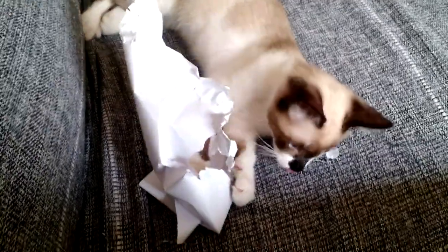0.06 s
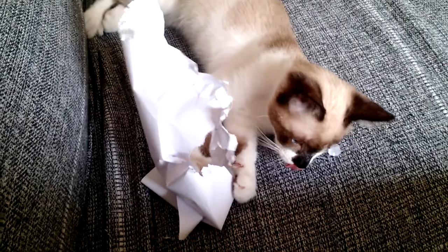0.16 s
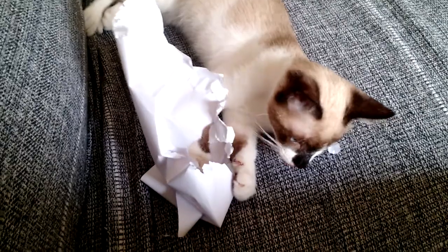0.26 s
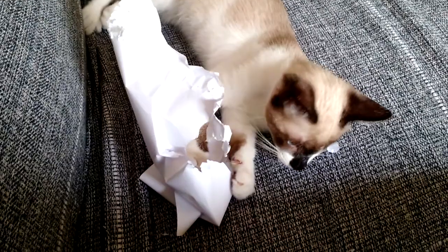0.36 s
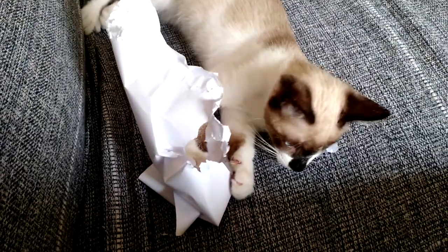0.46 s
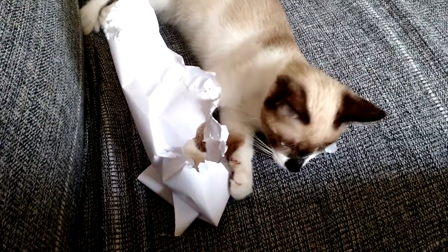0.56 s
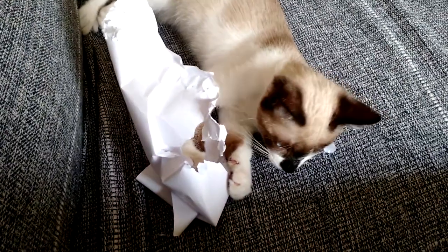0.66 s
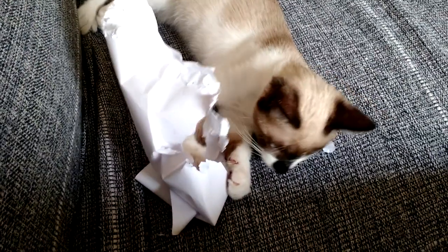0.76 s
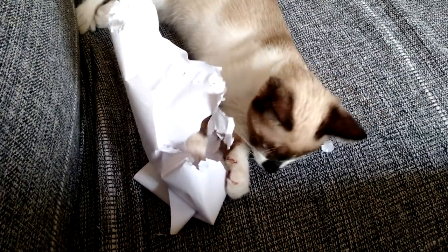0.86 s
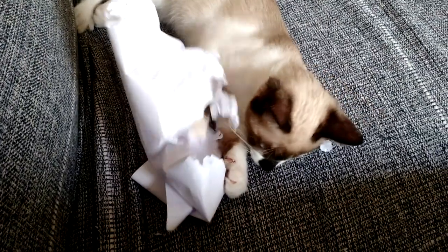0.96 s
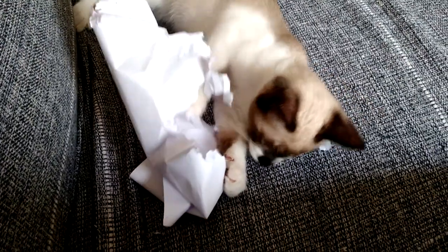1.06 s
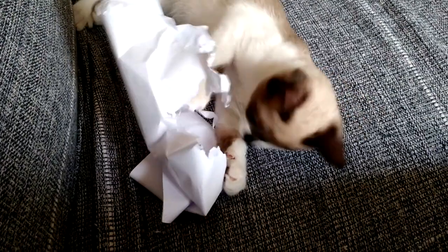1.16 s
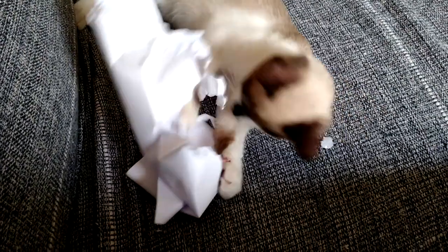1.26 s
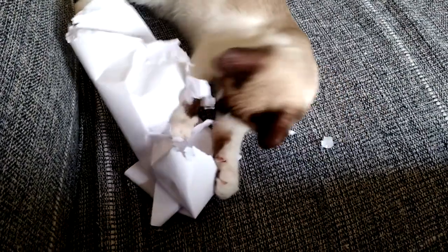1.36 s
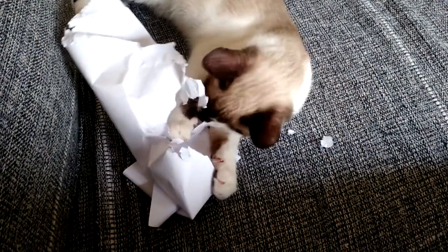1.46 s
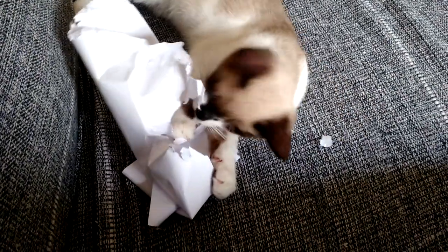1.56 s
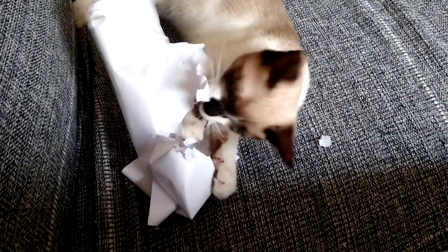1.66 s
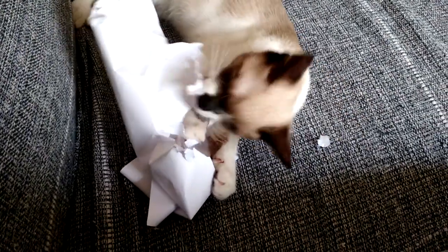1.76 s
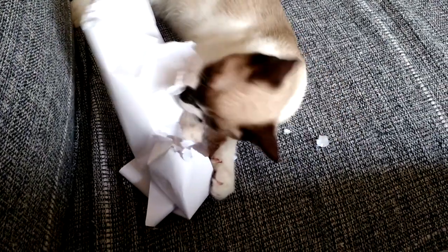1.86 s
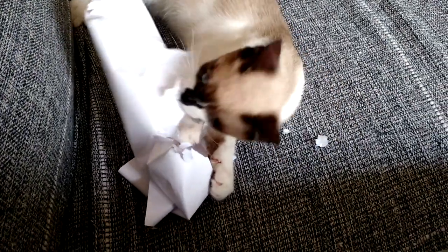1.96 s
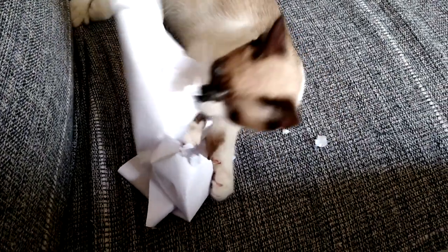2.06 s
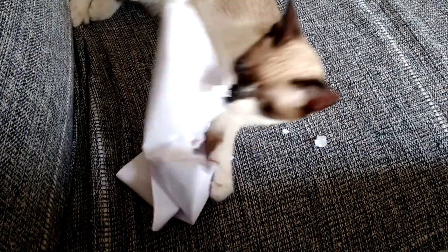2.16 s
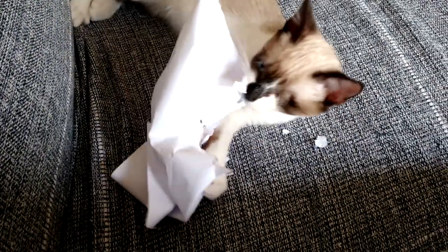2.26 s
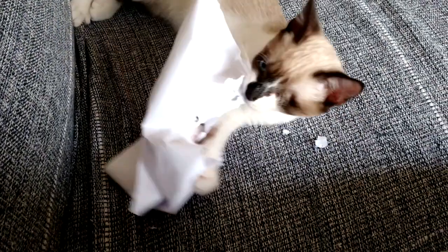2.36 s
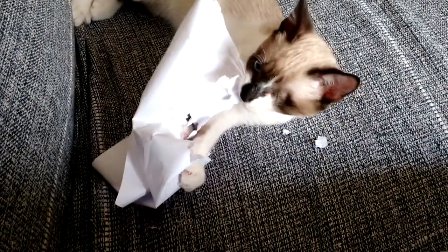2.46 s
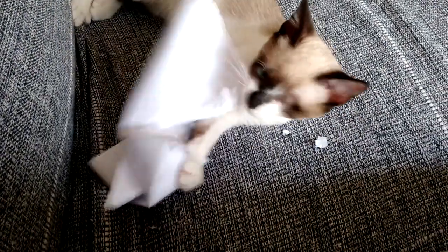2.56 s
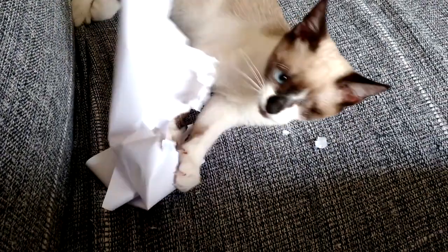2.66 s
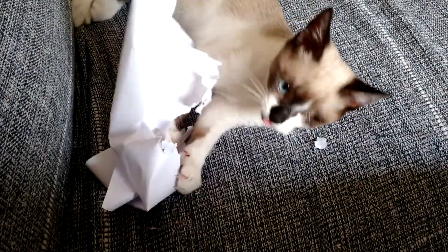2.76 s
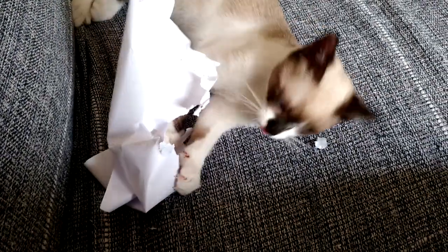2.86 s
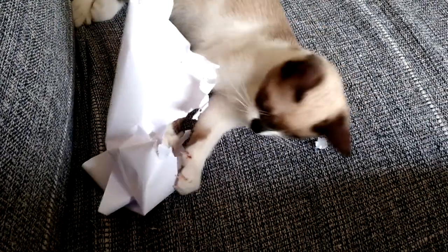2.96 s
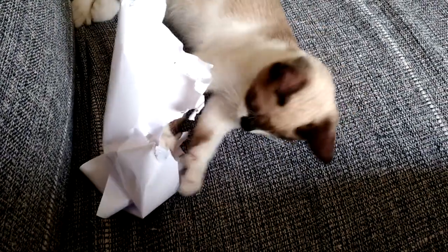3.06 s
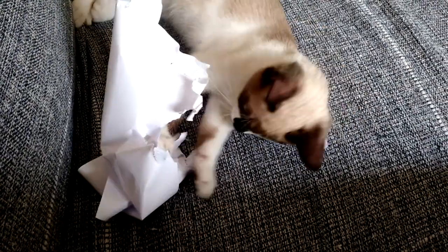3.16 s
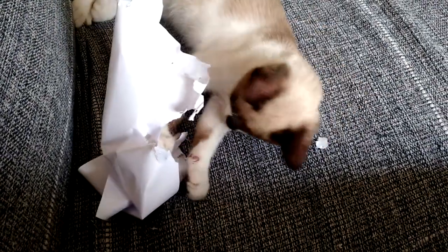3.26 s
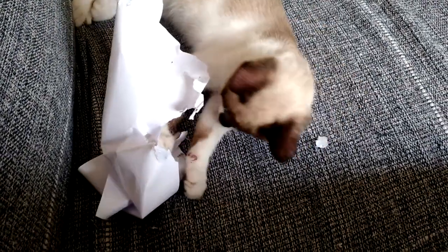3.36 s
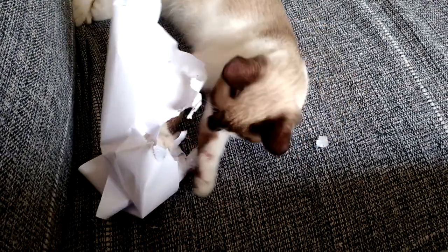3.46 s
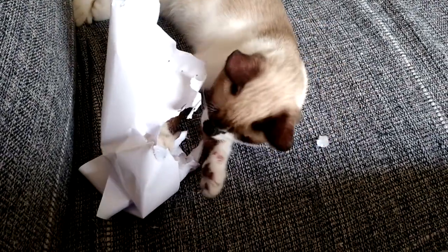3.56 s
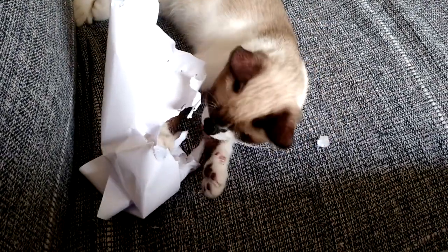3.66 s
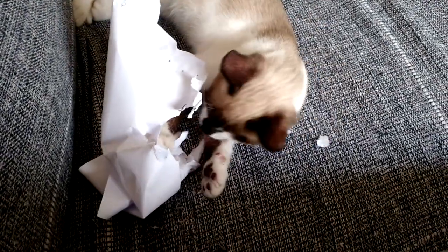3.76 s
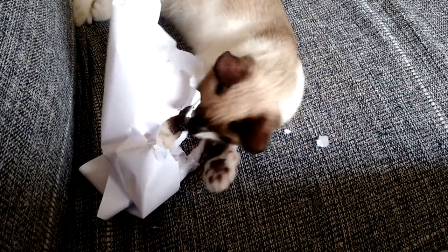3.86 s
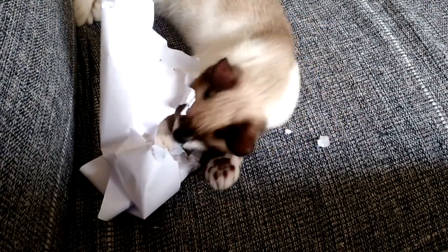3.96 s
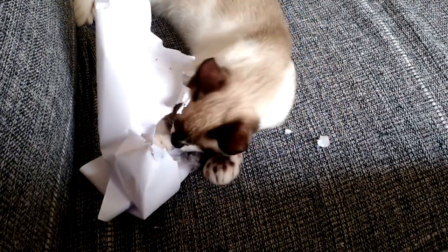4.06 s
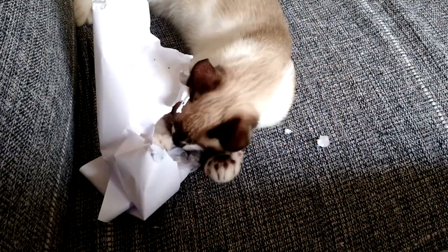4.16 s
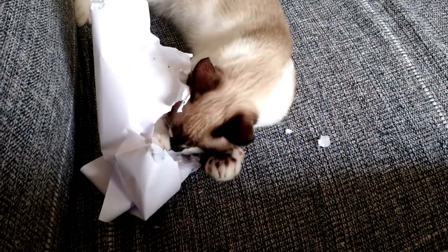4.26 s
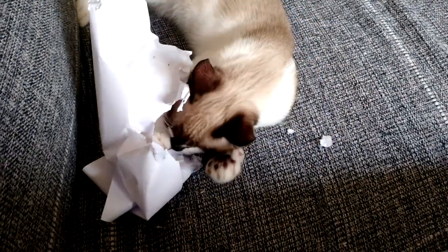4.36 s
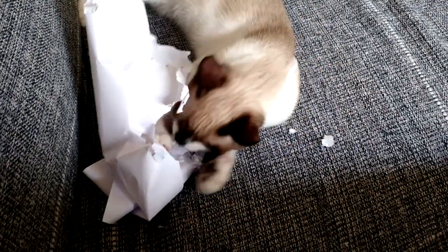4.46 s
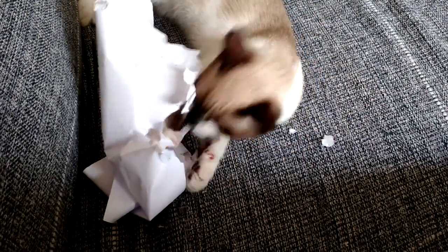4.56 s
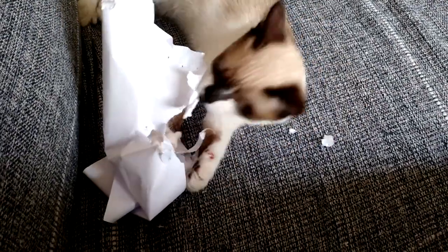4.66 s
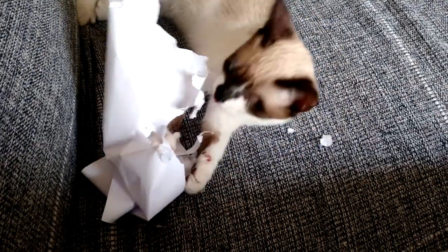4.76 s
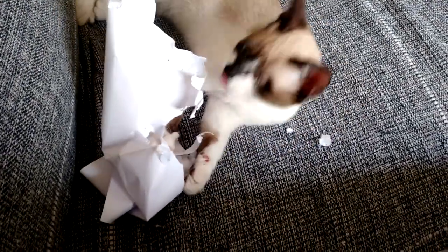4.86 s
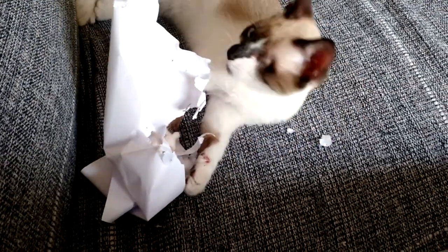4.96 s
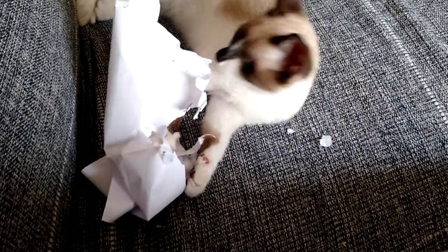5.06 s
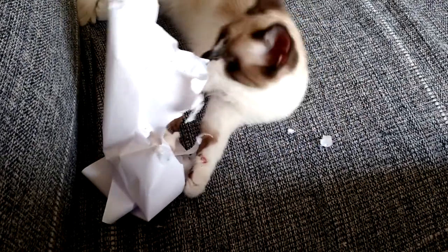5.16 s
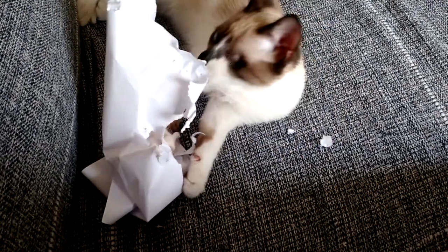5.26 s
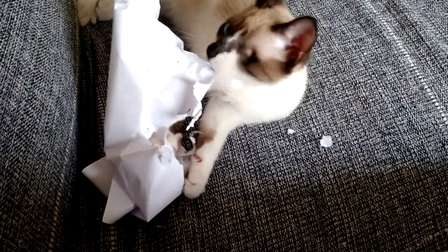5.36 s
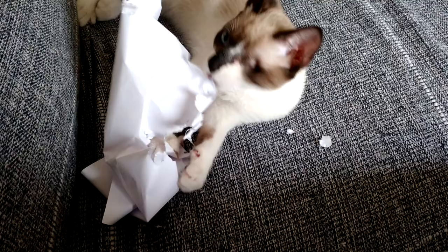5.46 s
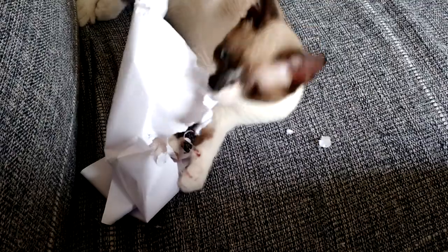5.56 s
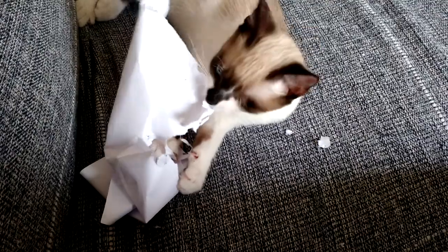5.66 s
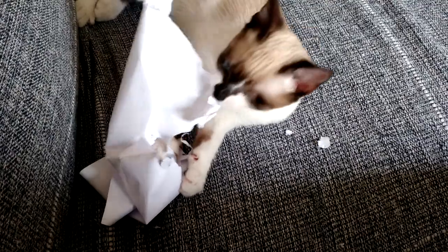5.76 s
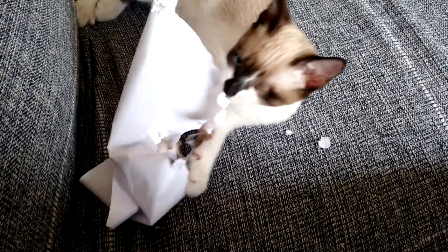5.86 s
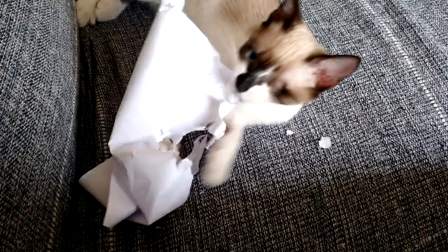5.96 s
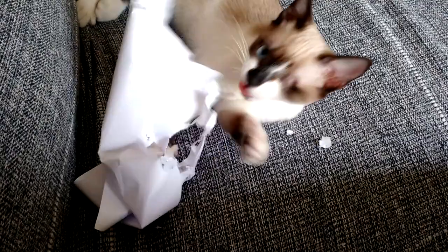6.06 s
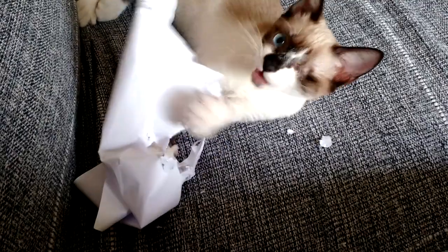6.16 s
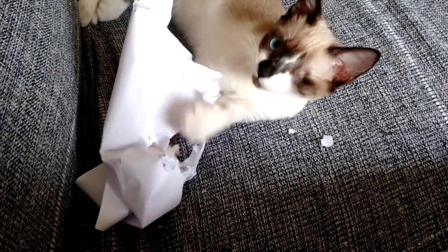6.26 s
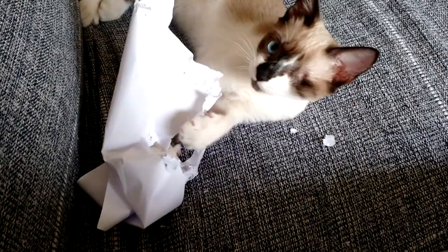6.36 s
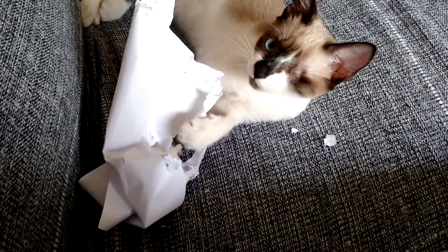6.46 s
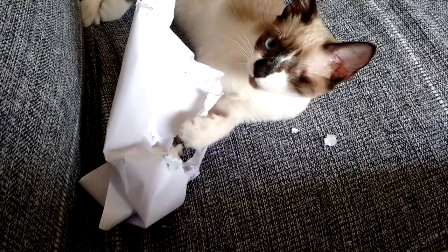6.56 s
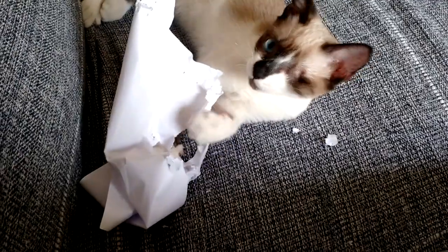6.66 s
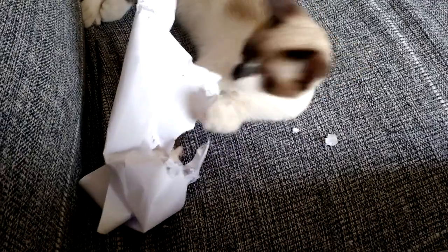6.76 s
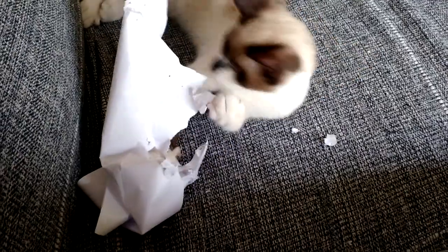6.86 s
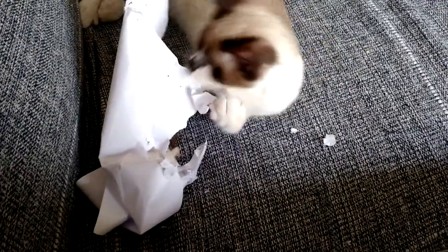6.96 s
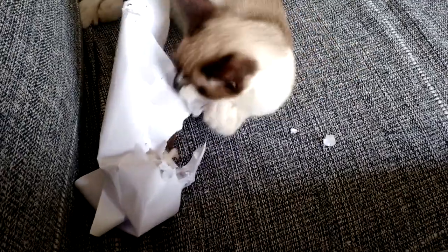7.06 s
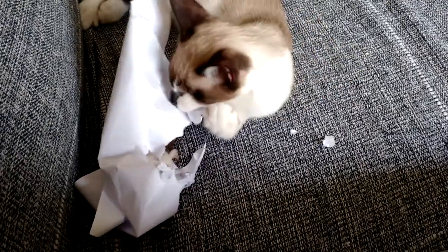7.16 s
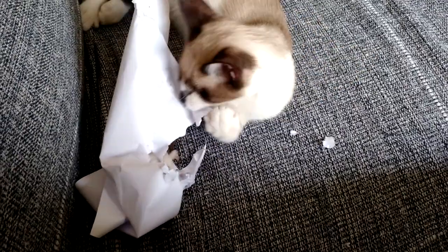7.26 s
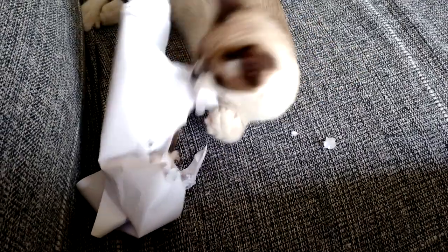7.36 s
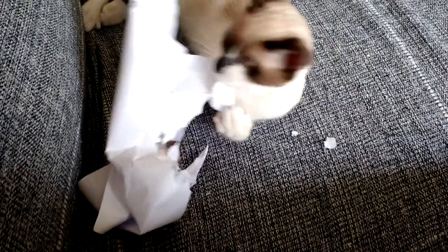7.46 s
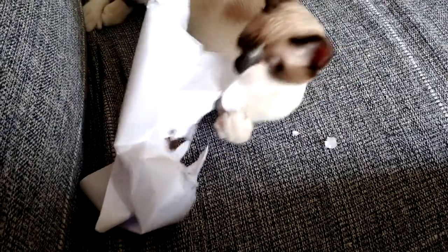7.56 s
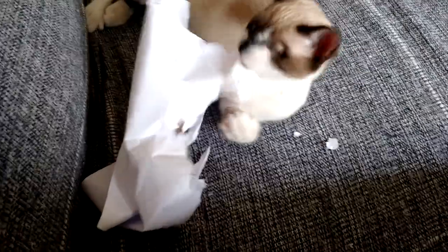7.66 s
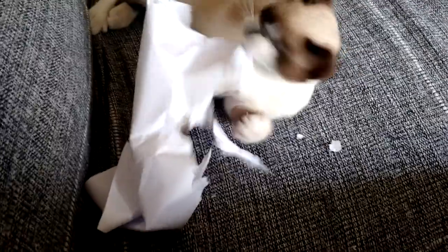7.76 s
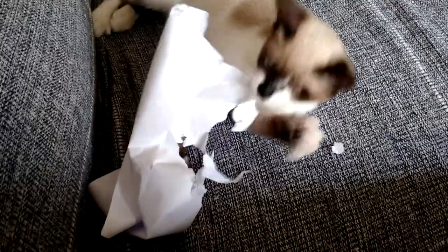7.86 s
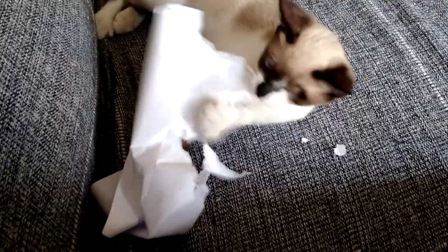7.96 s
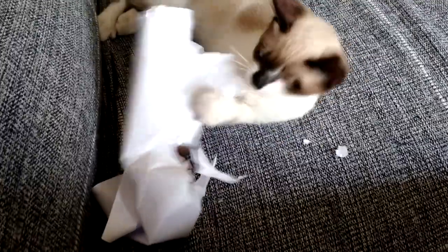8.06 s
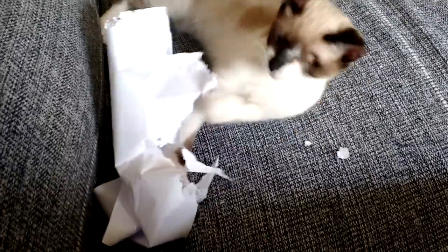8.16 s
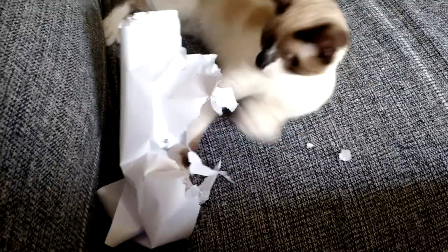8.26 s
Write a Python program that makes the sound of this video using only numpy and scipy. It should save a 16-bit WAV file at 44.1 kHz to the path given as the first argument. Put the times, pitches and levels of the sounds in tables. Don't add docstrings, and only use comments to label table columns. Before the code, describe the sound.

Stiff paper crinkles, snaps and rips in irregular bursts as a cat bites and claws it on a sofa in a quiet room.

```python
import sys
import numpy as np
from scipy import signal
from scipy.fft import rfft, irfft
from scipy.io import wavfile
from scipy.ndimage import uniform_filter1d

SR = 44100
rng = np.random.default_rng(int(sys.argv[2]) if len(sys.argv) > 2 else 0)


def undo_db(level):
    steps = np.asarray(level, float) / 20
    return 10 ** steps


def generate_wav(signal):
    frames = np.transpose(np.atleast_2d(signal))
    scaled = np.clip(frames, -1, 1) * 32767
    pcm = np.round(scaled).astype(np.int16)
    wavfile.write(sys.argv[1], SR, pcm)


N = 366912
HZ = np.fft.rfftfreq(N, 1 / SR)

# lowest and highest pitch in Hz,
# length of a pop in cycles, pops per second, spread of sizes in dB, gain in dB.
CREASE_SIZES = [(3050, 6900, 3.02, 4000, 1.5, 0.5), (450, 2500, 1.35, 1500, 2, -5),
                (6300, 13200, 3.3, 6000, 2.5, 4)]


def evened(x):
    return x / np.sqrt(np.mean(x ** 2) + 1e-20)


def read(points, hz):
    f, value = np.transpose(points)
    return np.interp(np.log(hz + 1), np.log(f + 1), value)


def add(mix, s, sound):
    part = mix[round(s * SR):][:len(sound)]
    part += sound[:len(part)]


def resonate(x, hz, width):
    return signal.lfilter(*signal.iirpeak(hz, hz / width, SR), x)


def band(x, lo_hz, hi_hz):
    sos = signal.butter(2, [lo_hz, min(hi_hz, .45 * SR)], "band", fs=SR, output="sos")
    return signal.sosfilt(sos, x)


def drift(per_s, channels=1):
    knots = rng.standard_normal((channels, 800))
    at = np.arange(N) / SR * per_s
    return np.array([np.interp(at, np.arange(800), k) for k in knots]) * np.sqrt(3 / 2)


def bending():
    # time of the peak in seconds, creases in dB,
    # time to fade 20 dB in seconds, tilt in dB towards big folds and away from fibres.
    pulls = [
        (0.269, -56.5, 0.4, 0),
        (1.168, -51.5, 0.06, -8),
        (1.365, -53.5, 0.02, -3),
        (2.315, -46, .4, -3),
        (3.223, -54.5, 0.23, 1.5),
        (4.745, -49.5, 0.29, -6),
        (5.495, -54, .17, 2),
        (6.385, -53.5, 0.5, -0.5),
        (7.39, -54, .13, -6),
        (8.25, -49.5, 0.29, -3),
    ]
    nudges = [(0.16, -65, .15, 8), (0.978, -52, 0.21, -5), (1.135, -51, .075, -6),
              (1.3, -54.5, 0.057, -1.5), (1.641, -52, 0.051, -8), (1.82, -59, .35, 2.5),
              (1.995, -47, .06, 4), (2.12, -55, .05, 2), (2.235, -54, .05, 11), (2.385, -52, .08, 5),
              (2.53, -52, .04, -1), (2.72, -56, .04, 5), (2.487, -48, .075, -5), (2.575, -59, 0.044, 13),
              (2.8, -67.5, .3, 6.5), (2.98, -57.5, 0.26, 6), (3.09, -53, 0.26, -2), (4.33, -63, .25, 3.5),
              (4.67, -61, .11, 10.5), (4.929, -58, 0.085, -7), (5.37, -57.5, 0.066, 0),
              (5.632, -58, .04, 2), (5.7, -65, .3, -7), (5.808, -54, .035, 1), (6.0, -48.5, .065, 4),
              (6.1, -53, .06, 11), (6.108, -50, .045, 1.5), (6.68, -57.5, 0.09, -6), (7.18, -55, .06, -5),
              (7.485, -57.5, .09, -2), (7.797, -48.5, .06, 4.5), (7.917, -63, .08, 8),
              (8.093, -46.5, .055, -2.5), (8.125, -57, .04, 9), (8.19, -50, .03, -8),
              (8.165, -47.5, .09, 1.5)]
    jolts = [(0.822, -50, .07, 0.5), (1.4, -47.5, .3, -1), (1.705, -40, .075, -6.5), (1.96, -47, .1, 0),
             (2.066, -68, .11, 14), (2.236, -49, .05, -11), (2.451, -50, .25, -1.5),
             (2.657, -41.5, 0.075, 0), (4.55, -57.5, 0.23, 6), (5.215, -57, 0.067, -6),
             (5.557, -55.5, .18, 2.5), (5.757, -67, 0.13, 15), (5.897, -46, .11, 2.5),
             (6.256, -55, .22, -2), (6.8, -56.5, .22, -4), (7.085, -54, .35, -2), (7.56, -53, .07, -1),
             (7.652, -43.5, .1, 5), (7.7, -52, .04, -5), (8.045, -51, .25, -0.5)]
    let_go, jolt_rise = 0.23, 0.12
    nudge_round = 1.5
    folds_db, fibres_db, fibre_loss = 1.2, -5, 0.35
    t, power = np.arange(0, N + 64, 64) / SR, 1e-11
    kinds = ((pulls, 1, let_go, 1), (nudges, 1, 1, nudge_round), (jolts, jolt_rise, 1, 1))
    for moves, rise, fall, bend in kinds:
        s, db, fade_s, tilt_db = np.transpose(moves)[:, :, None]
        away = np.maximum((s - t) / rise, (t - s) / fall) / fade_s
        db = db - 20 * away ** bend
        levels_db = np.array([db, db + folds_db + tilt_db, db + fibres_db - fibre_loss * tilt_db])
        power = power + np.sum(undo_db(2 * levels_db), axis=1)
    return [np.interp(np.arange(N) / SR, t, np.sqrt(p)) for p in power]


def rustle(clump_db=1.9, patch_db=3.2):
    out, clumps = np.zeros((3, N)), drift(90)[0]
    for (lo, hi, cycles, per_s, spread_db, gain_db), level in zip(CREASE_SIZES, bending()):
        chance, big, kind = rng.random((3, N))
        size_db = -1.3 * spread_db * np.log(big + .012) + clump_db * clumps
        size = undo_db(size_db) * (chance < per_s / SR)
        pops = np.zeros((3, N))
        for k, hz in enumerate(np.linspace(lo ** .5, hi ** .5, num=10) ** 2):
            u = np.arange(400) / SR * hz
            pop = np.sin(2 * np.pi * u) * u * np.exp(-u * 5 / cycles)
            patch = np.repeat(undo_db(patch_db * rng.standard_normal(N // 1500 + 2)), 2600)[260 * k:][:N]
            struck = size * patch * ((kind * 10).astype(int) == k)
            pops[k % 3] += signal.oaconvolve(struck, pop / np.linalg.norm(pop))[:N]
        out += evened(pops) * level * undo_db(gain_db - 4.0)
    return out


def snap(s, db, low_db, high_db, fold_hz, length, lead=.007):
    t, out = np.arange(2500) / SR - lead, 0
    noise, patch = rng.standard_normal((3, len(t))), rng.random(2)
    rings_hz = (3300 * 2 ** patch[0], fold_hz, 7000 * 1.26 ** patch[1])
    rel_dbs = (-1.5, low_db - 2.0, high_db + 1.5)
    lasts, rings = (.75, 1.1, .65), (.45, 1.2, .45)
    for (lo, hi, *_), rel_db, last, ring, n, hz in zip(CREASE_SIZES, rel_dbs, lasts, rings, noise, rings_hz):
        u = np.maximum(t, 0) / max(length * last, .001)
        lead_in = 0.094 * np.exp(np.minimum(t, 0) / (.5 * length))
        shape = undo_db(-17 * u) * (1 - np.exp(-(u / 0.22) ** 2) + lead_in)
        burst = (evened(band(n, lo, hi)) + ring * evened(resonate(n, hz, 0.19 * hz))) * shape
        out = out + burst * np.linalg.norm(shape) / np.linalg.norm(burst) * undo_db(db + rel_db + 7.5)
    u = np.maximum(t, 0) * 240
    push = np.sin(2 * np.pi * u) * u * np.exp(-1.6 * u) * undo_db(db + low_db - 3.5)
    return s - lead, out + push


def snaps():
    # start in seconds, body in dB, big folds and fibres in dB against the
    # body, fold pitch in Hz.
    cracks = [(0.837, -46, 0, -2, 1600), (1.3794, -20, -17, 1, 1460), (1.965, -42, -12, -16, 1679),
              (2.0553, -36, 9.5, 1.5, 1780), (2.1849, -41.5, -2, 3, 1302), (2.2342, -41, -20.5, 6, 915),
              (2.2937, -25.5, -6.5, -32, 910), (2.6525, -24, -0.3, -22, 1900),
              (4.533, -29.5, -3.5, -10, 1500), (5.5434, -37, 4.5, -30, 1880), (5.7466, -26, -6.5, -7, 1460),
              (5.797, -38, -4.5, -13, 1390), (6.2925, -41, 13, -23, 1100),
              (6.4355, -41.5, -7.5, -10.4, 860), (7.632, -41, 4.5, -21.5, 1162),
              (7.6504, -42, 9, 2.5, 1250), (7.7955, -41, 9, 0, 1520), (7.818, -43, 3, 2.5, 1330),
              (8.0355, -34.5, 0, -1.5, 1050), (8.1772, -34, -2.5, -32, 1660), (8.2091, -32, -0.5, -5, 1700)]
    # start in seconds, body in dB, #
    # big folds and fibres in dB against the body, fold pitch in Hz.
    rips = [(2.646, -38, 2.5, -12, 900), (1.16, -49.5, -17, 0.4, 527), (1.8226, -44.5, -6.5, -15, 1593),
            (1.8895, -49, -3, -4.5, 1055), (2.1335, -49.5, 2, -9.6, 1679), (2.3804, -44, 5.5, -5.2, 1190),
            (4.43, -49, -12, -18, 1388), (5.623, -46, 4, -18, 574), (5.703, -42, -5.5, -23, 880),
            (5.889, -44, -3.5, 1.5, 2160), (6.092, -40, -7, -21, 1870), (6.256, -42.5, -15, -11, 506),
            (7.642, -34, -2, -3.5, 1350), (8.0865, -34, -12, -6, 1496), (8.093, -38.5, -8, 0.5, 1614)]
    # start in seconds, body in dB, fibres in dB against the body.
    ticks = [(0.138, -46, -10), (0.401, -46, -3), (0.4438, -45, -11), (0.497, -50, -13), (0.828, -48, -6),
             (1.546, -42, 3.5), (1.632, -42, 5), (1.638, -46, 11), (1.644, -46, 11), (1.65, -45, 9),
             (1.656, -47.5, 13.5), (1.695, -50, 13), (2.032, -41.5, 5), (2.1639, -47, -5), (2.452, -48, -1),
             (3.563, -47, -11), (4.948, -47, -3), (4.966, -41.5, 2), (5.000, -45, -1), (5.759, -43, -19),
             (5.95, -45, -8), (6.264, -43, -9), (7.2867, -45, -11), (7.388, -40, -14), (7.691, -42, -2),
             (7.712, -48, 5), (8.031, -46, 6), (8.2373, -54, 14), (8.241, -41.5, 8.5), (8.2577, -44, 5)]
    # start in seconds, big folds in dB, fold pitch in Hz.
    flops = [(1.545, -45.5, 1300), (1.632, -47, 1400), (4.1, -55.5, 900), (4.19, -54, 1200),
             (2.062, -51, 1950), (2.2724, -33.5, 506), (4.292, -54, 678), (4.5544, -37, 504),
             (4.8598, -52, 775), (6.566, -55, 680), (7.1256, -39.5, 1600), (7.2523, -49.5, 1340),
             (7.468, -45, 1335), (7.5735, -40.5, 1080), (7.789, -37.5, 753), (7.9183, -48.5, 882)]
    crack_s, rip_s, tick_s, flop_s = .0051, .011, 0.0029, 0.0064
    crack_s_per_db = .00006
    tick_fold_db, tick_fold_hz = -12.5, 1100
    flop_body_db, flop_fibre_db = -13, -2
    rows = [(*row, crack_s + crack_s_per_db * row[2]) for row in cracks]
    rows += [(*row, rip_s) for row in rips]
    rows += [(s, db, tick_fold_db, high_db, tick_fold_hz, tick_s) for s, db, high_db in ticks]
    rows += [(s, db + flop_body_db, -flop_body_db, flop_fibre_db, hz, flop_s) for s, db, hz in flops]
    return [snap(*row) for row in rows]


def scrape(s, length, db, hz):
    width_hz, grit_db = .27 * hz, 5.5
    slips, grit = rng.standard_normal((2, 6000))
    t = np.arange(6000) / SR
    stroke = np.clip(np.minimum(t / .003, (length - t) / (.45 * length)), 0, 1)
    drive = evened(slips * undo_db(grit_db * evened(uniform_filter1d(grit, size=60)))) * stroke
    rung = resonate(resonate(drive, hz, width_hz), hz, 3 * width_hz)
    return s, rung * undo_db(db) * np.sqrt(SR / (np.pi * width_hz))


def scrapes():
    # start in seconds, length in seconds, level in dB, pitch in Hz.
    drags = [(.905, .035, -50, 6500), (.96, .04, -55, 4400), (1.0, .03, -53, 6400), (1.1, .05, -50, 6300),
             (1.155, .03, -47, 5800), (1.45, .03, -53, 3600), (1.625, .035, -46, 7400),
             (1.687, .032, -40, 7300), (1.705, .045, -47, 3500), (1.95, .09, -42.5, 3600),
             (1.975, .06, -43, 9000), (1.965, .065, -45, 1750), (2.063, .018, -45, 1900),
             (2.22, .06, -50, 4000), (2.233, .026, -38.5, 6900), (2.295, .03, -45, 4300),
             (2.465, .07, -45, 7000), (2.445, .02, -52, 1500), (2.47, .07, -45, 4500),
             (2.56, .04, -56, 1400), (3.06, .03, -53, 4500), (4.55, .02, -54, 4300), (4.69, .09, -56, 3900),
             (4.7, .05, -52, 7200), (5.36, .025, -53, 4000), (5.47, .06, -57, 1500),
             (5.63, .022, -51, 4300), (5.8, .018, -44, 6200), (5.8, .018, -44, 4500),
             (5.888, .075, -46, 3200), (6.09, .022, -40, 4200), (6.085, .022, -50, 420),
             (6.088, .045, -47, 8800), (6.3, .11, -51, 4500), (6.3, .1, -54, 7000),
             (6.436, .014, -47, 3500), (6.66, .06, -56, 7100), (6.665, .05, -59, 3100),
             (7.14, .065, -51, 4300), (7.22, .018, -54, 4200), (7.255, .04, -54, 6500),
             (7.353, .045, -47, 4500), (7.352, .05, -59, 6800), (7.467, .02, -54, 1300),
             (7.515, .02, -56, 1100), (7.56, .012, -52, 1100), (7.66, .055, -46, 7600),
             (7.768, .022, -48, 4300), (8.065, .015, -46, 1200), (8.095, .05, -50, 1700),
             (8.15, .025, -52, 1800), (8.215, .04, -50, 1750)]
    return [scrape(*row) for row in drags]


def ping(s, db, hz, t60):
    t = np.arange(2500) / SR
    pair = np.sin(2 * np.pi * hz * t) + .6 * np.sin(2 * np.pi * 1.13 * hz * t)
    return s, pair * undo_db(db - 60 * t / t60)


def pings():
    # start in seconds, peak in dB, pitch in Hz, time to die by 60 dB in seconds.
    releases = [(.259, -44, 1100, .012), (.272, -48, 4000, .008), (.412, -50, 6500, .006),
                (.455, -49, 7000, .006), (.507, -47, 4200, .01), (.617, -48, 1200, .015),
                (.729, -49, 3800, .008), (.827, -42, 1300, .015), (1.3742, -40, 4000, .02),
                (1.3797, -12, 6400, .005), (1.3815, -25, 3600, .016), (1.4935, -46, 6500, .006),
                (1.553, -44, 3600, .008), (1.8265, -40, 4300, .008), (2.0555, -18, 1700, .011),
                (2.0555, -26, 7000, .008), (2.066, -35, 900, .02), (2.2935, -22, 4640, .008),
                (2.3195, -38, 4500, .01), (3.067, -50, 900, .012), (4.533, -34, 1900, .02),
                (4.557, -34, 1500, .012), (4.912, -48, 6500, .008), (5.5445, -29, 3400, .012),
                (5.627, -35, 500, .03), (5.705, -36, 3480, .02), (5.761, -36, 1200, .012),
                (5.951, -38, 3200, .006), (6.258, -38, 3300, .015), (6.268, -38, 1500, .008),
                (6.295, -25, 1500, .011), (6.294, -34, 380, .04), (6.635, -48, 6000, .008),
                (7.127, -38, 800, .02), (7.592, -44, 4400, .008), (7.645, -31, 4600, .01),
                (7.691, -36, 1100, .02), (7.818, -38, 7000, .008), (8.032, -38, 6300, .012),
                (8.152, -40, 1200, .012), (8.178, -27, 1750, .035), (8.178, -31, 3900, .012),
                (8.2085, -30, 4400, .012), (8.2095, -32, 1750, .03), (8.237, -36, 9500, .015),
                (8.258, -36, 6800, .012)]
    return [ping(*row) for row in releases]


def at_ports(places):
    lags = [-0.000017, 1.5e-5, 8e-5]
    # frequency in Hz, level in dB.
    shadow = [(300, 2.8), (1300, -7.5), (2700, -6), (5000, -7), (8000, -16), (15000, -20)]
    lagged = rfft(places) * np.exp(-2j * np.pi * HZ * np.array(lags)[:, None])
    return np.array([irfft(lagged.sum(0) * undo_db(read(shadow, HZ)), N), places.sum(0)])


def bumps():
    # start in seconds, level in dB, pitch in Hz, time to die by 60 dB in seconds.
    touches = [(1.6, -45, 256, 0.09), (1.88, -37, 80, .12), (2.3, -51, 200, .1), (3.301, -48, 450, 0.18),
               (4.101, -54, 300, .08), (4.7, -42, 60, .15), (5.04, -42, 396, 0.072), (6.001, -35, 70, 0.15),
               (6.601, -39, 60, .15), (6.75, -49, 50, .12), (7.658, -36, 198, 0.076),
               (7.769, -33, 64.5, 0.19), (8.0, -44, 130, 0.13)]
    out, t = np.zeros(N), np.arange(8000) / SR
    for s, db, hz, t60 in touches:
        noise = rng.standard_normal(2 * len(t))
        puff = evened(band(noise, 0.955 * hz, 1.34 * hz)[len(t):])
        add(out, s, puff * undo_db(db - 60 * t / t60) * (1 - np.exp(-t / 0.0023)))
    return out


def far(rows, modes):
    s, db = np.transpose(rows)
    t = np.arange(s[0], s[-1], 1 / SR)
    noise = rng.standard_normal((len(modes), len(t) + SR // 4))
    rung = 0
    for (hz, width, gain_db), n in zip(modes, noise):
        rung = rung + undo_db(gain_db) * evened(resonate(resonate(n, hz, width), hz, 3 * width))
    return s[0], evened(rung[-len(t):]) * undo_db(np.interp(t, s, db) - 6.5) * signal.windows.tukey(len(t), .25)


def through_window():
    # time in seconds, level in dB.
    swells = [
        [(4.76, -76), (4.795, -69), (4.826, -47.5), (4.886, -49), (4.915, -43.5), (4.96, -52), (5.208, -66),
         (5.218, -82), (5.24, -76)],
        [(6.46, -54), (6.552, -55), (6.562, -50), (6.716, -58.5), (6.794, -54.5), (6.916, -67), (6.928, -72),
         (6.98, -65)],
    ]
    # pitch in Hz, width in Hz, level in dB.
    panes = [
        [(520, 43, -3.5), (615, 36, -4), (638, 16, 1), (746, 140, -4), (835, 11.3, 1), (940, 35, -11)],
        [(502, 40, 3.5), (627, 130, 5.5), (700, 200, -9), (770, 62, -1), (936, 44, -4.5)],
    ]
    out = np.zeros(N)
    for rows, modes in zip(swells, panes):
        add(out, *far(rows, modes))
    return out


def room(x):
    # frequency in Hz, time to die by 60 dB in seconds.
    decay = [(200, 0.26), (1000, 0.12), (4000, 0.09), (12000, 0.075)]
    taps = np.zeros((2, SR // 2))
    at = np.arange(360, SR // 2 - 20, 20) + rng.integers(0, 20, (2, (SR // 2 - 361) // 20))
    np.put_along_axis(taps, at, rng.choice([-1., 1.], at.shape), 1)
    hz, t, z = signal.stft(taps, SR, nperseg=128)
    fade = undo_db(-60 * t / read(decay, hz)[:, None]) * np.minimum(t / 0.02, 1) ** 2
    tail = signal.istft(z * fade, SR, nperseg=128)[1]
    return signal.fftconvolve(x[None], tail / np.linalg.norm(tail[0]), axes=1)[:, :N]


def noise_floor():
    # frequency in Hz, level in dB per Hz.
    port_noise = [(15, -63.5), (35, -59), (70, -69), (130, -88), (300, -89.5), (600, -99), (1000, -104.5),
                  (1600, -107), (2600, -104), (4000, -101.5), (6000, -101.5), (9000, -105.5),
                  (14000, -107.5), (16000, -108)]
    # frequency in Hz, level in dB per Hz.
    room_air = [(30, -81), (61, -63.5), (120, -88.5), (250, -83), (500, -91.5), (900, -107), (2000, -113),
                (15000, -125)]
    # time in seconds, level in dB.
    hand = [(0.0, 4), (0.4, -4), (1.2, -8), (2.0, -2), (2.4, -5), (2.8, -0.5), (3.6, -3), (4.8, -0.1),
            (5.2, -4.5), (6.0, 3), (6.8, -1.5), (7.3, -3), (7.8, 3), (8.32, -3.5)]
    hum_hz, hum_db = 62.3, -54
    z = rfft(rng.standard_normal((3, N))) * np.sqrt(SR / 2)
    hiss = irfft(z[:2] * undo_db(read(port_noise, HZ)), N)
    grip_db = np.interp(np.arange(N) / SR, *np.transpose(hand)) + 3.5 * drift(7)
    hiss = hiss + band(hiss, 8, 130) * (undo_db(grip_db) - 1)
    air = irfft(z[2] * undo_db(read(room_air, HZ)), N) * undo_db(1.3 * drift(2.52)[0])
    hum = evened(resonate(rng.standard_normal(N), hum_hz, 16.)) * undo_db(hum_db)
    return hiss + air + hum


def scene():
    paper = rustle()
    for k, sound in enumerate(snaps()):
        add(paper[k % 3], *sound)
    for k, sound in enumerate(scrapes() + pings()):
        add(paper[k % 3], *sound)
    outside = through_window()
    ports = at_ports(paper) + undo_db(-14.0) * room(paper.sum(0))
    ports = ports + outside + undo_db(-4.0) * room(outside) + noise_floor()
    return ports + bumps() * np.array([[1], [0]])


def low_pass(x):
    return signal.sosfilt(signal.butter(12, 16470, fs=SR, output="sos"), x)


def record(dry):
    # frequency in Hz, level in dB.
    cross = [(30, -1.3), (1300, -1.2), (2600, -1.1), (5500, -8), (8400, -9.5), (15000, -14)]
    cross_hz, edge_hz = 2890., 15520.
    z = rfft(dry)
    turn = 2 * np.pi * HZ / cross_hz + .7 * HZ ** 2 / (HZ ** 2 + 1300 ** 2)
    z = z - z[::-1] * undo_db(read(cross, HZ)) * np.exp(-1j * turn)
    z = z / (1 + (HZ / edge_hz) ** 120)
    return low_pass(irfft(z, N))


dry = scene()
out = record(dry)
generate_wav(out)
```